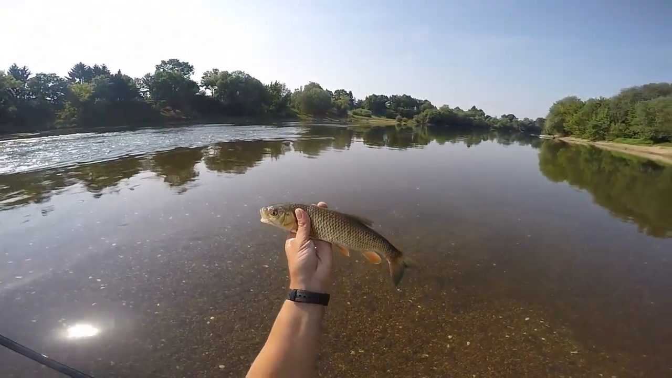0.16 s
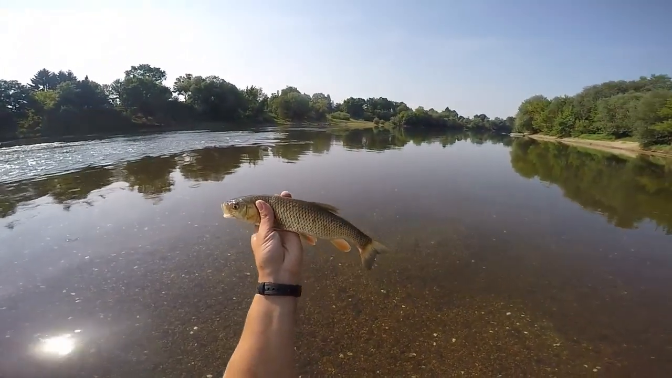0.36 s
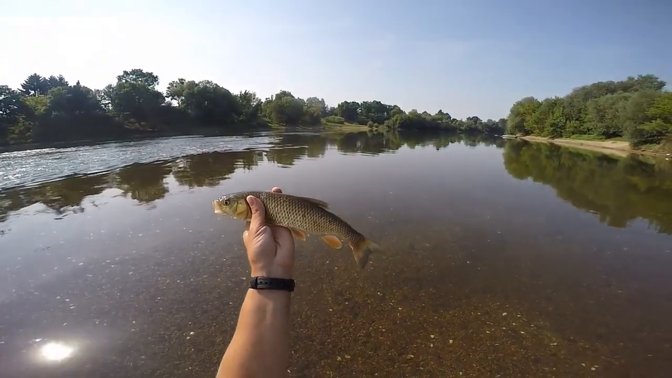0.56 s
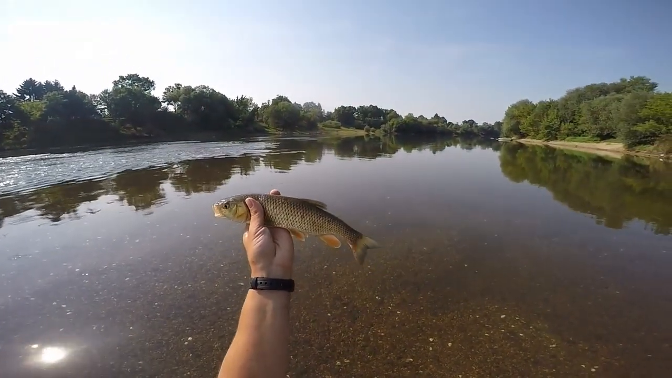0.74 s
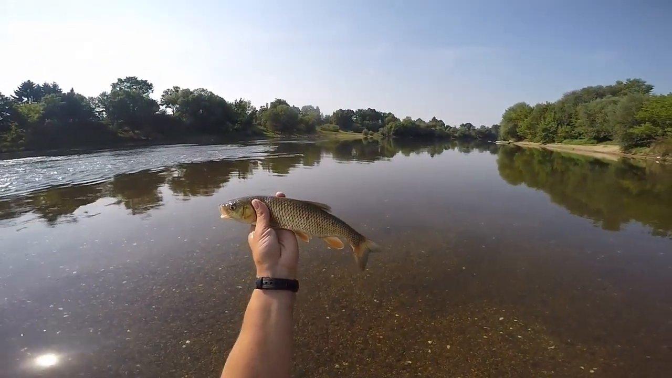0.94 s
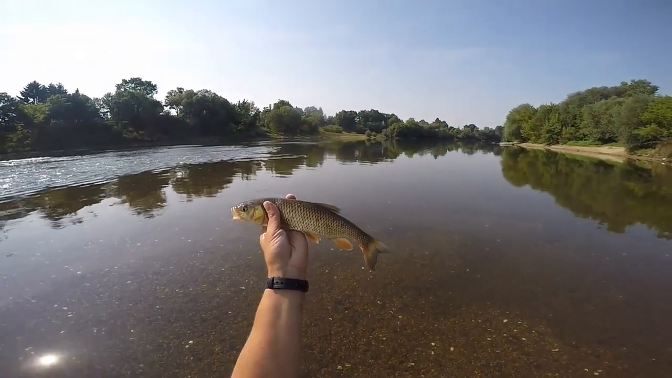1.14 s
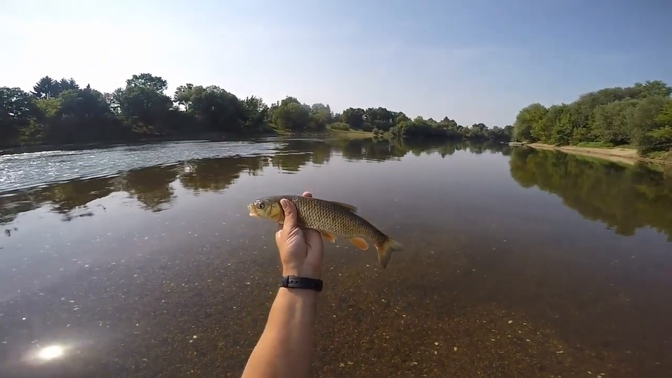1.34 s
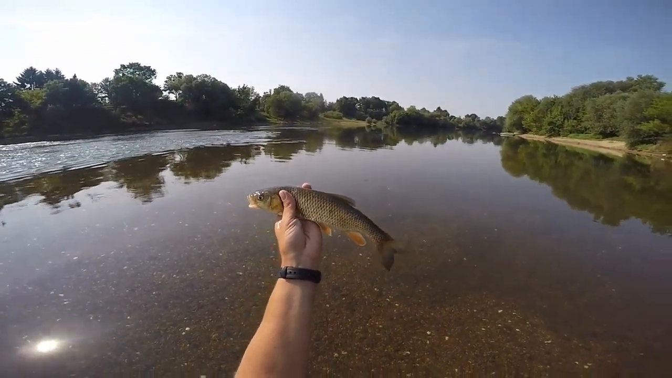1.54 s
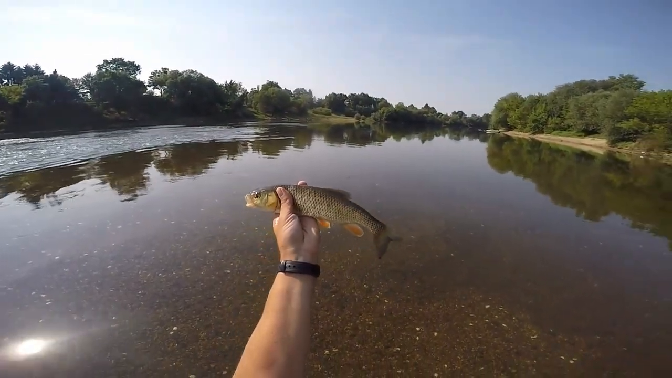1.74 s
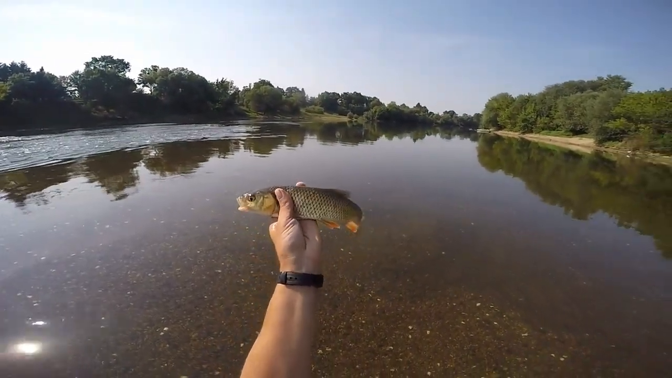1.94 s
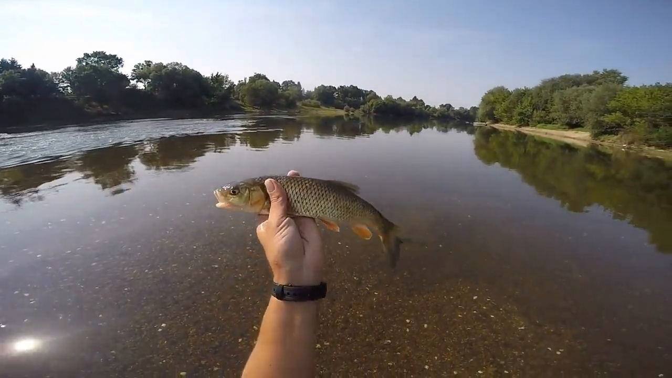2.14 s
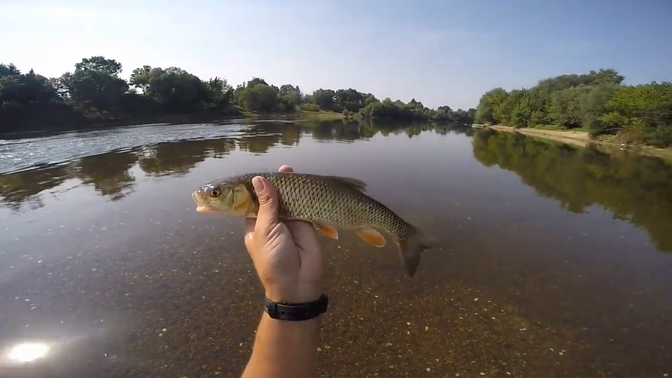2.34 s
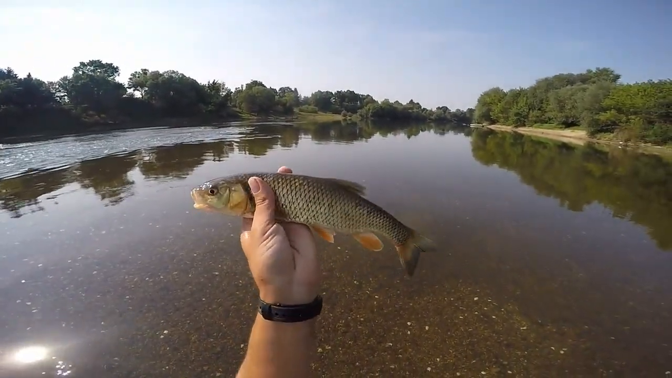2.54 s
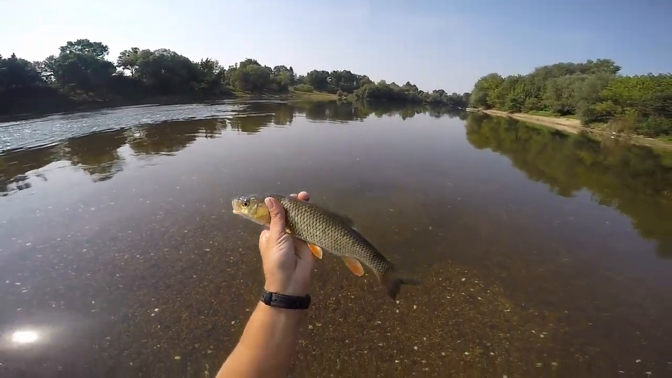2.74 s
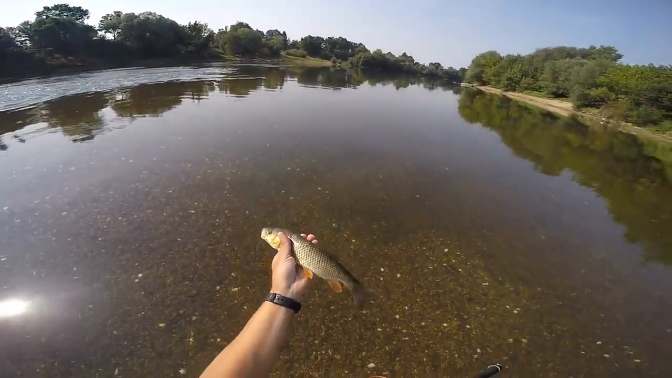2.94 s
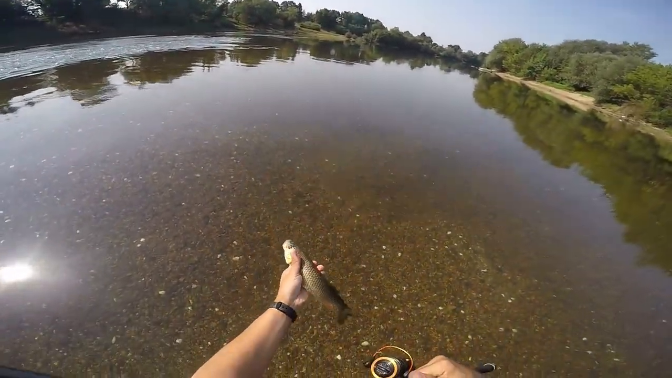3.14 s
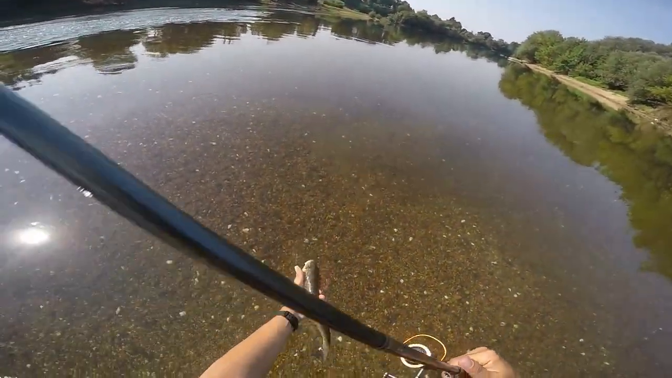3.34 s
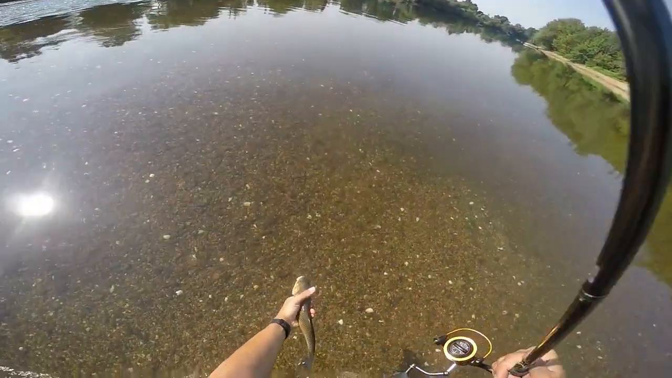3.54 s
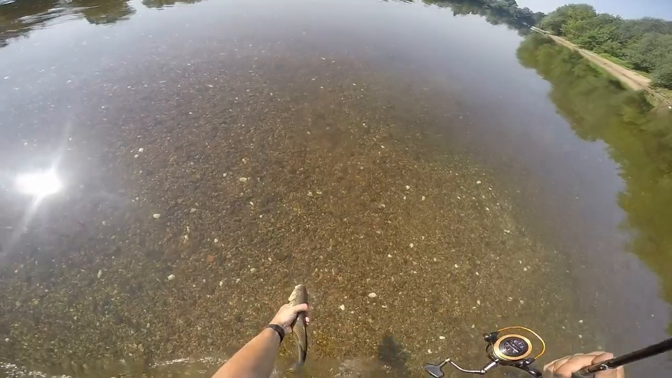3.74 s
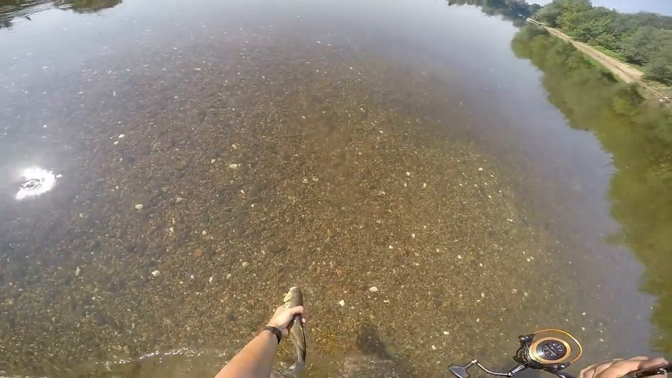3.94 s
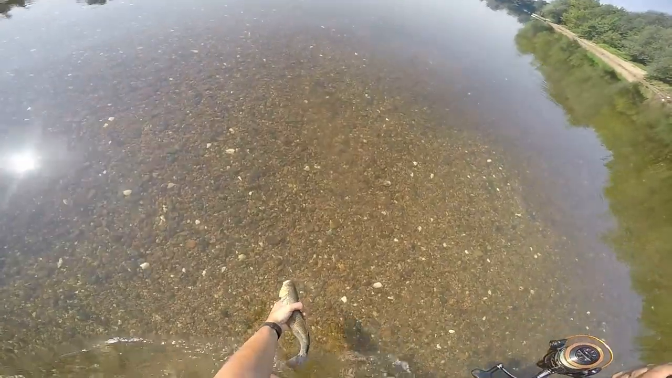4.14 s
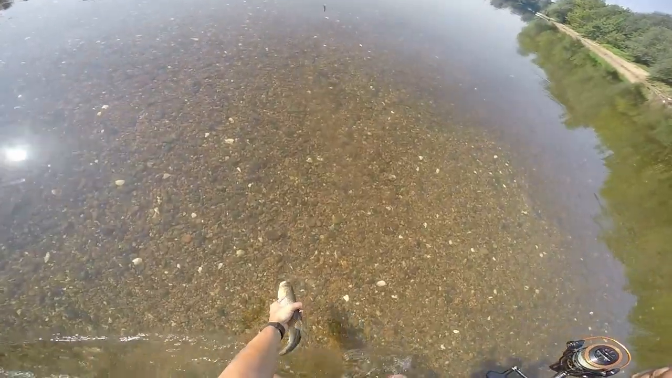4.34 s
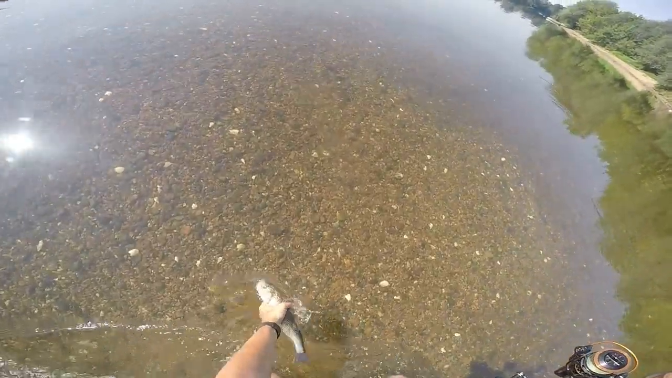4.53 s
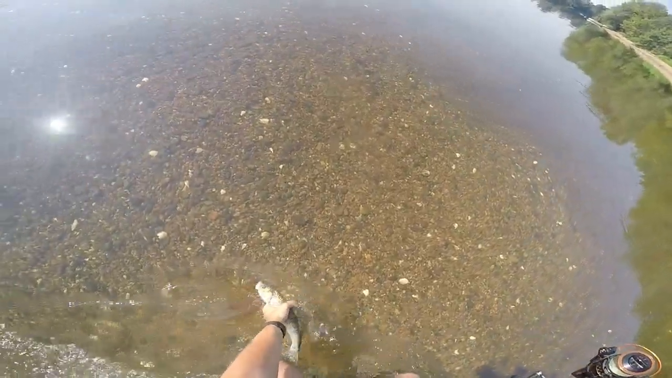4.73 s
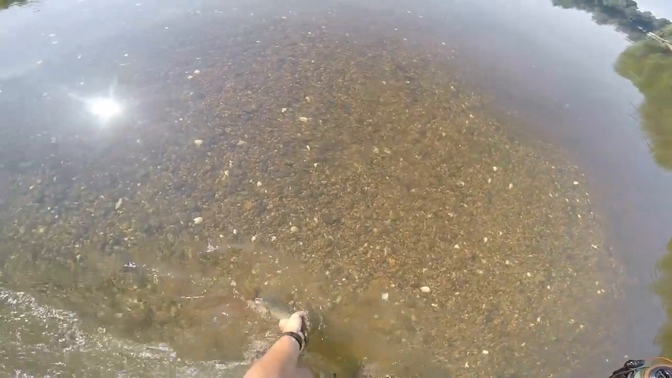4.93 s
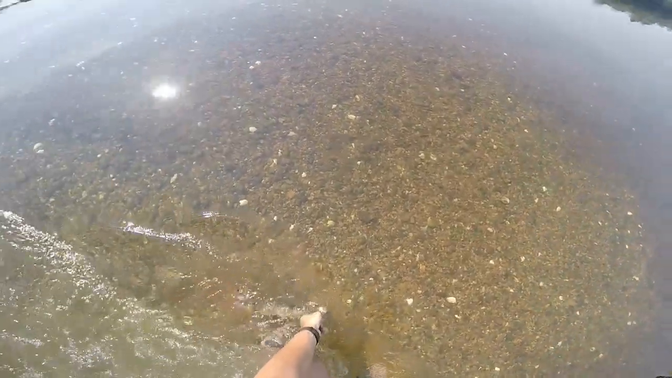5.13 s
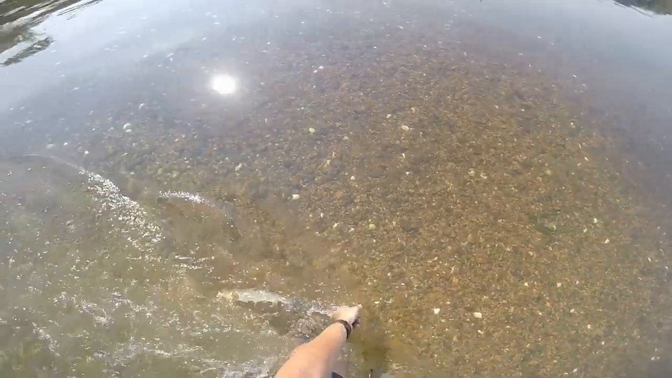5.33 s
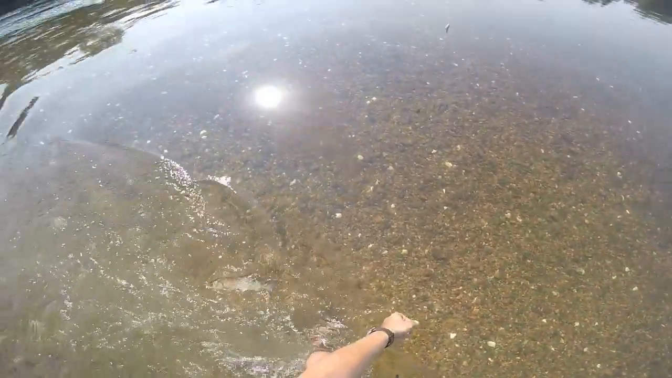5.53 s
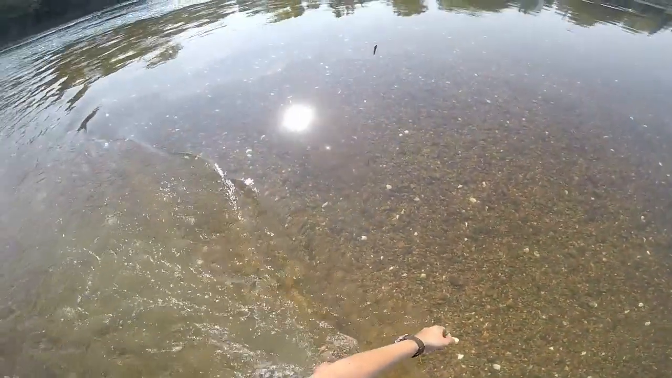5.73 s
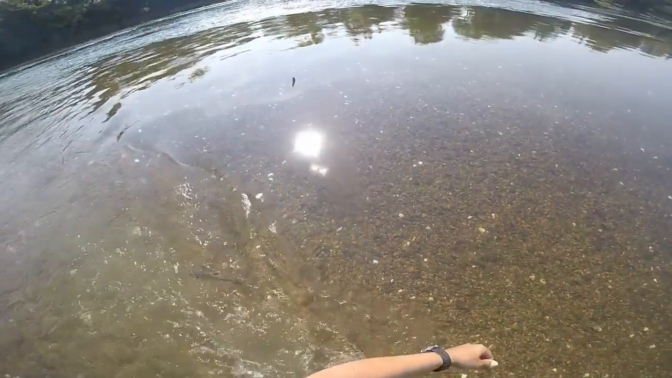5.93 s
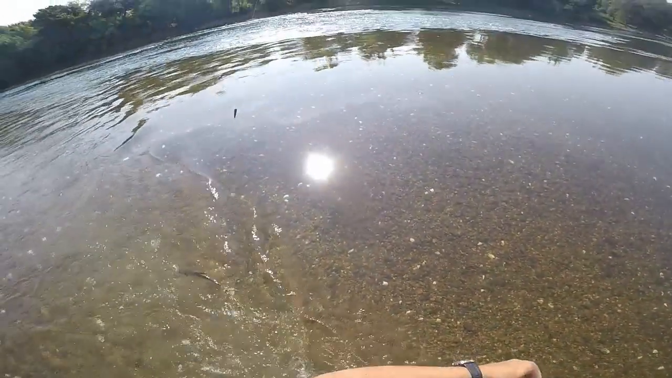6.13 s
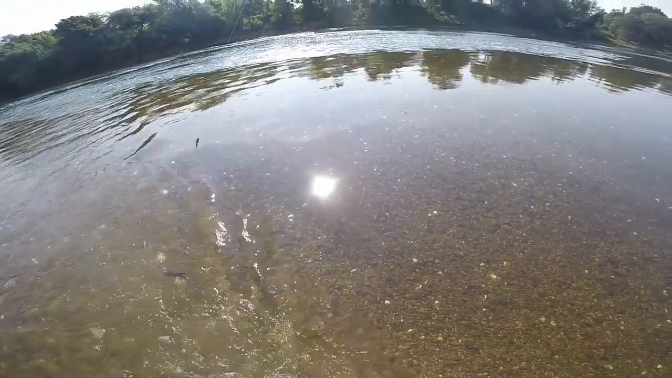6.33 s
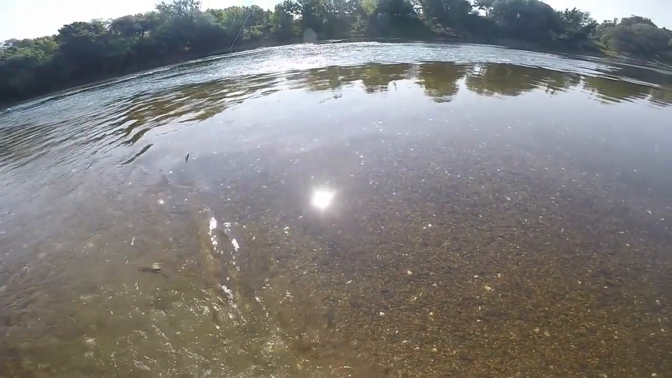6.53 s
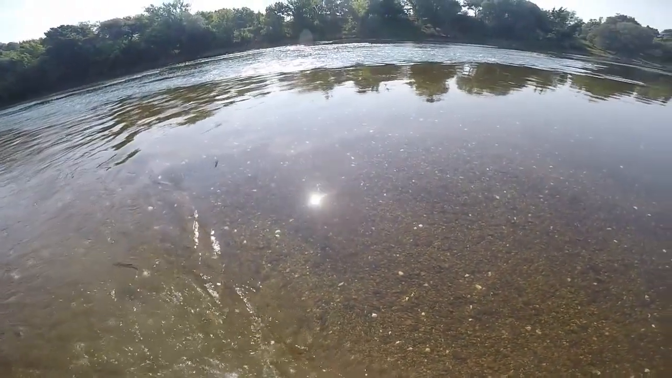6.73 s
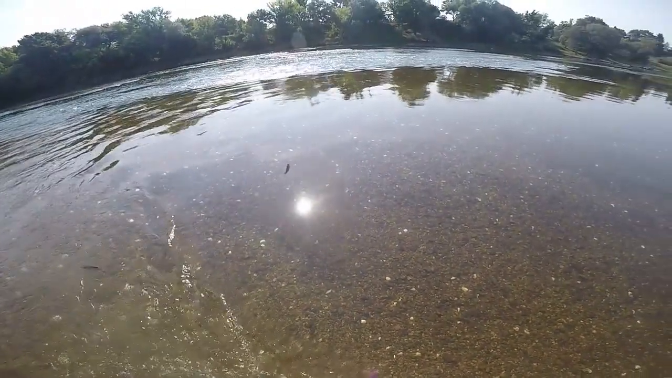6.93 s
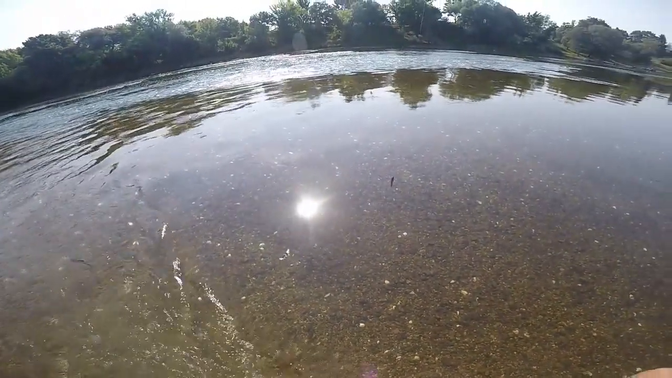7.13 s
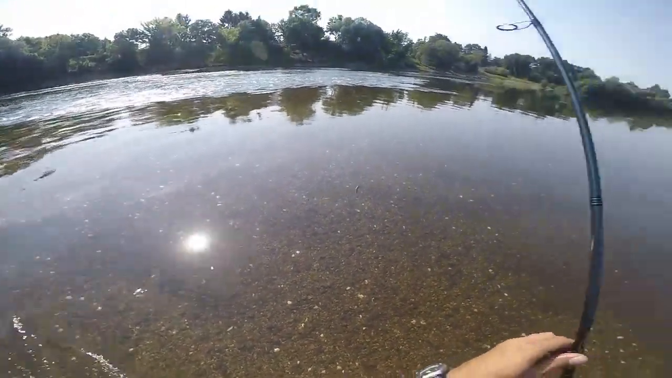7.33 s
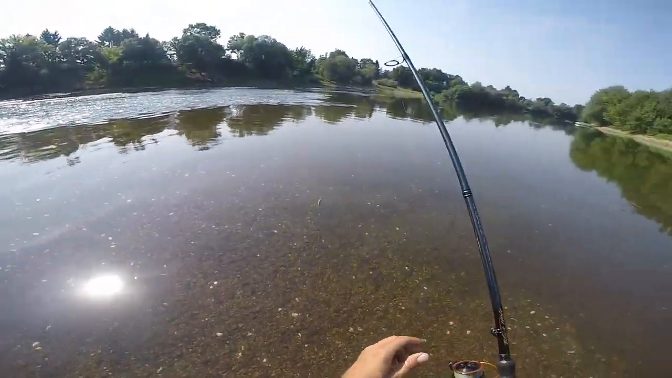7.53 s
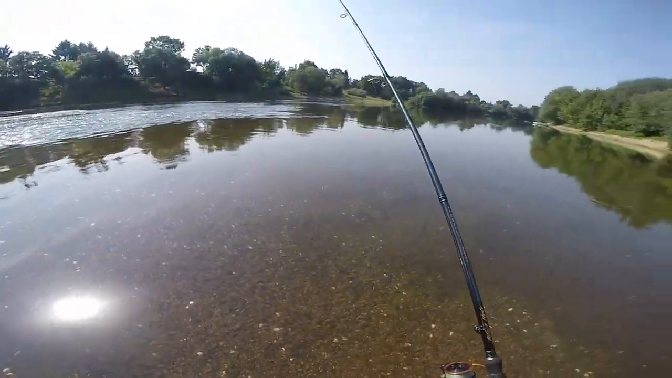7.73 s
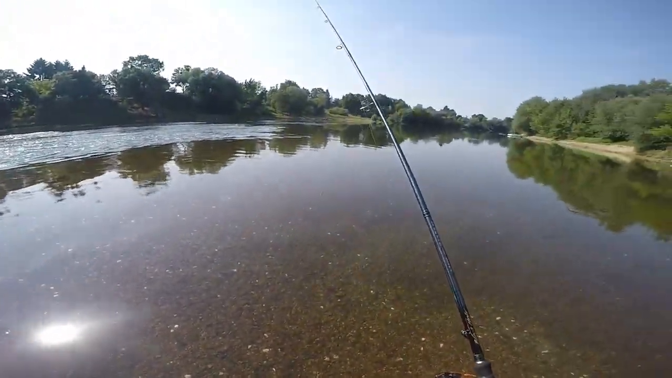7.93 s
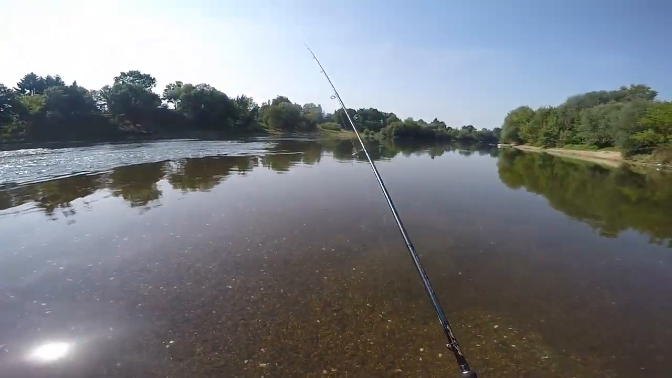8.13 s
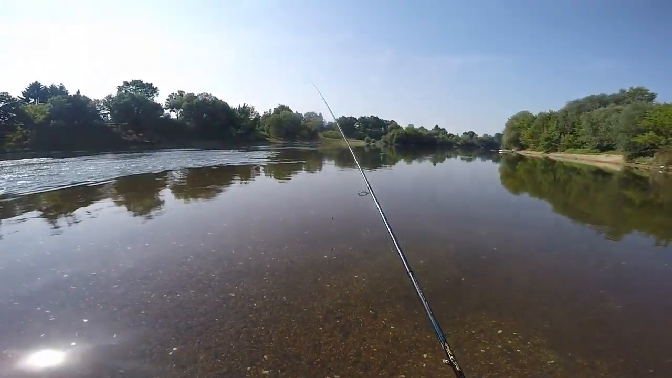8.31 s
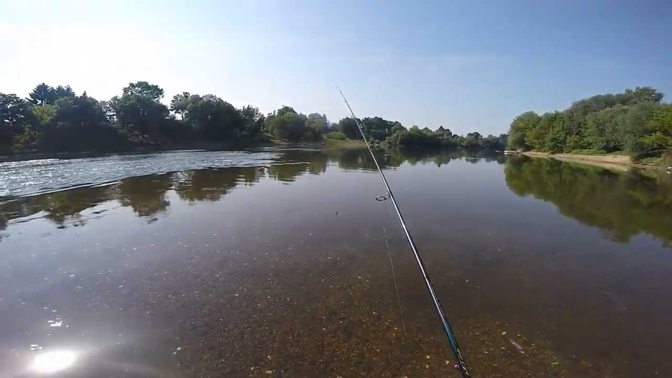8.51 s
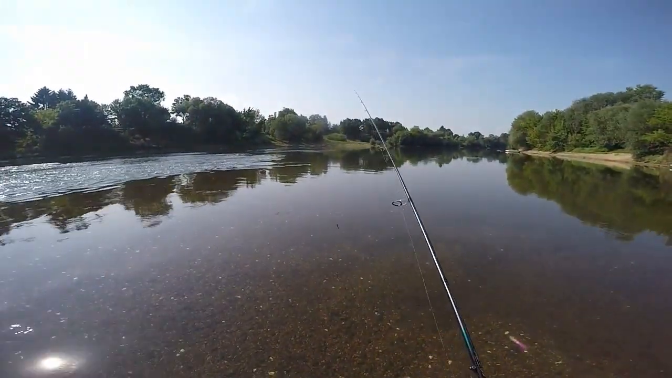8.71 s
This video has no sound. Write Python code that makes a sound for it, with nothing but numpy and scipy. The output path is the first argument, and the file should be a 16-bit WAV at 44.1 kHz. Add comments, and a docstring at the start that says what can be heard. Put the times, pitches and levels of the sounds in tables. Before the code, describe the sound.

Outdoors on a calm shallow river, heard from a body-worn microphone in a closed case. Soft gurgles, drips and an even distant hiss come first, with dull low knocks. Around the middle, water is stirred close by, a fish kicks free with a small bubbly splash and fine droplets, then the wash fades to gentle lapping. A deep uneven rumble of movement runs beneath.

```python
"""A shallow, slow river: an angler wades and lets a fish go, while a riffle hisses far off.
Close by, the bow wave of the steps breaks into filtered bubble grains, plinks and droplet ticks; gliding sines
make the gurgles round the legs, the tail splash and the rings of the drops. Coloured noise makes the riffle.
The microphone is in a body-worn camera in a closed case, whose resonances lift a few bands; it also picks up
a low rumble of movement from shaken noise, knocks on the mount, and a thin electronic whine."""
import sys
import numpy as np
from scipy import signal
from scipy.fft import rfft, irfft
from scipy.io import wavfile
from scipy.ndimage import uniform_filter1d

SR = 44100
rng = np.random.default_rng(int(sys.argv[2]) if len(sys.argv) > 2 else 0)


def generate_wav(signal):
    """Clip the signal to [-1, 1] and save it as 16-bit WAV at the path in sys.argv[1]."""
    frames = np.transpose(np.atleast_2d(signal))
    scaled = np.clip(frames, -1, 1) * 32767
    pcm = np.round(scaled).astype(np.int16)
    wavfile.write(sys.argv[1], SR, pcm)


N = 386754  # length in samples

# Water stirred by legs and hand, most as the fish swims off: (time [s], relative level [dB])
WADING_CURVE = [(0, -70), (1.5, -73), (2.9, -80), (3.4, -73), (3.65, -59.5), (4.2, -56.5), (4.55, -58),
                (4.84, -54.5), (4.97, -58.5), (5.35, -56.5), (5.85, -59), (6.2, -65), (6.75, -63),
                (7.2, -65), (7.5, -70), (8.3, -71), (8.77, -65)]
# The fish kicks free and beats air under: (start [s], length [s], rms level over that length [dB])
TAIL_SPLASH_EVENT = (4.6, .36, -57.5)
# Largest air pockets under wavelets and splashes:
# (time [s], relative level [dB], starting pitch [Hz], share by which the pitch rises, or falls if negative [-])
GURGLE_EVENTS = [(0.365, -45.5, 468, .16), (0.547, -48, 447, 0.5), (0.707, -47, 395, 0.38),
                 (1.105, -46.5, 422, 0.26), (1.145, -46, 530, 0.67), (1.333, -48.5, 336, 0.36),
                 (1.47, -47, 360, .45), (2.365, -49, 468, 0.083), (3.561, -50.5, 300, -.1),
                 (3.608, -45.5, 203, 0.19), (3.625, -39.5, 890, -.1), (3.758, -41, 814, 0.34),
                 (3.823, -41.5, 356.5, 0.15), (4.207, -44.5, 370, 0.37), (4.35, -41, 1013, -0.023),
                 (4.463, -37.5, 297, 0.25), (4.491, -52.5, 491, .4), (4.796, -46, 987, 0.068),
                 (4.817, -40, 2030, .1), (5.406, -48.5, 377, -.06), (5.457, -51, 315, -0.022),
                 (5.681, -46, 523, .2), (6.924, -49, 396, .35), (7.568, -48, 377, -0.16),
                 (7.944, -51, 329, 0.36), (8.503, -47, 370, 0.077), (8.632, -44.5, 626, 0.18)]
# Nearest drops: (time [s], relative level [dB], pitch of the ring [Hz])
DRIP_EVENTS = [(0.1, -46.5, 3500), (0.328, -50, 3530), (0.436, -52.5, 2400), (0.956, -45, 1010),
               (1.892, -45, 1000), (2.246, -47.5, 930), (3.39, -47.5, 1130), (3.439, -41.5, 930),
               (3.621, -50.5, 7740), (3.967, -43, 3600), (4.181, -52, 7940), (4.475, -39.5, 987),
               (4.707, -40, 4220), (4.994, -42.5, 3600), (5.359, -44, 3700), (5.616, -42.5, 2520),
               (5.626, -39.5, 3450), (5.678, -42.5, 3510), (6.708, -45, 3700), (6.751, -47, 4300),
               (6.76, -51, 7260), (6.793, -42.5, 1010), (6.882, -42, 3600), (7.175, -43, 980),
               (7.264, -47.5, 4040), (7.448, -41, 1020)]
# Sharp little clicks: (time [s], peak level [dB], centre frequency [Hz])
CLICK_EVENTS = [(4.471, -42.5, 8600), (4.645, -42.5, 9200), (4.745, -43, 9600), (5.207, -45, 9200),
                (7.012, -44.5, 10300), (8.673, -41, 3740)]
# Spectrum of the stirred water and the trickle: (frequency [Hz], relative level [dB])
WASH_SPECTRUM = [(200, -3), (330, -6), (550, -1), (900, 3), (1250, -2.5), (1700, 1.5), (2200, -4),
                 (3000, -6.5), (4400, -5), (5500, -16), (8000, -13)]
# Spectrum of the falling droplets: (frequency [Hz], relative level [dB])
SPRAY_SPECTRUM = [(3000, -8), (4400, -1), (5500, -7), (7200, -2.5), (8000, -3.5), (9100, 0.5),
                  (10200, -7.5), (15000, -7)]
# Colour of the wavelets' gulps: (frequency [Hz], relative level [dB])
GULP_COLOUR = [(280, -7), (450, 1), (700, -2)]
# Spectrum of the far broken water: (frequency [Hz], relative level [dB])
RIFFLE_SPECTRUM = [(60, 12.5), (120, 4), (250, -2), (420, -3), (700, -5.5), (1000, -8), (1400, -9),
                   (2400, -13), (3000, -14), (4500, -16), (7000, -19), (10000, -22.5), (15000, -24.5)]
# How strongly the wearer moves (holds still, bends down, stands up): (time [s], relative level [dB])
MOTION_CURVE = [(0, -40), (1.3, -46), (1.62, -39.5), (2.4, -49), (3.1, -41), (3.32, -33.5), (3.6, -35.5),
                (4.03, -27.5), (4.2, -36), (4.44, -30.5), (4.62, -40.5), (5.0, -41), (5.62, -31),
                (5.9, -37.5), (6.9, -39.5), (7.58, -37), (8.2, -42.5), (8.77, -46.5)]
# Spectrum of the mount's boom: (frequency [Hz], relative level [dB])
BOOM_SPECTRUM = [(28, -9), (37, 1), (45, 2), (54, -5), (66, -17.5), (85, -35), (125, -59), (250, -60)]
# Spectrum of the deep sway: (frequency [Hz], relative level [dB])
SWAY_SPECTRUM = [(14, 0.5), (22, -8.5), (31, 5), (38, -18.5), (50, -23)]
# Knocks on the camera mount: (time [s], relative level [dB])
BUMP_EVENTS = [(0.5634, -30), (0.865, -30.5), (1.589, -36.5), (8.179, -37)]
# Air resonances of the camera case: (frequency [Hz], width [Hz], lift before the power is restored [dB])
CASE_RESONANCES = [(980, 205, 8.5), (2377, 310, 5), (3483, 370, 7.5), (4300, 140, -0.5)]

SPRAY_BELOW_WASH_DB, SPRAY_FOLLOWS = 12.5, 1  # at the height of the splash; dB of spray per dB of wash
GURGLE_CYCLES = 16.7    # ring length in cycles of the starting pitch, so low pockets last longest
DRIP_RING_S = 0.0085    # ring length of the case at 1 kHz; higher pitches ring shorter
RIFFLE_DB, WHINE_DB = -58, -78.5  # rms levels before their flutter
CUTOFF_HZ = 15350


def from_db(db):
    """Decibels to gain."""
    return 10 ** (np.asarray(db) / 20)


def rms_one(x):
    """Scale to unit power."""
    return x / np.sqrt(np.mean(x ** 2) + 1e-20)


def in_time(rows):
    """Each column of a curve, at every sample."""
    s, *columns = np.transpose(rows)
    return [np.interp(np.arange(N) / SR, s, c) for c in columns]


def add(out, s, sound):
    """Mix a short sound in at time s."""
    i = int(np.clip(round(s * SR), 0, N))
    out[i:i + len(sound)] += sound[:N - i]


def coloured(x, spectrum):
    """Filter a sound by a spectrum that falls away outside its end points; rms 1."""
    hz, db = np.transpose(spectrum)
    f = np.maximum(np.arange(N // 2 + 1) * SR / N, 1)
    skirts = np.minimum(f / hz[0], 1) ** 2 * np.minimum(hz[-1] / f, 1) ** 2
    gain = from_db(np.interp(np.log(f), np.log(hz), db))
    return rms_one(irfft(rfft(x) * skirts * gain, N))


def drift(rate):
    """Slow random wander of unit rms: noise through two equal poles at rate Hz."""
    # computed at every 40th sample; the first 2000 values let the filter settle
    r = np.exp(-80 * np.pi * rate / SR)
    noise = rng.standard_normal(N // 40 + 2002)
    slow = signal.lfilter([1], [1, -2 * r, r * r], noise)[2000:]
    return np.interp(np.arange(N) / 40, np.arange(len(slow)), rms_one(slow))


def resonance(x, hz, width_hz):
    """Two-pole band-pass with gain near 1 on top."""
    r = np.exp(-np.pi * width_hz / SR)
    zeros = np.array([1, 0, -1]) * (1 - r * r) / 2
    poles = [1, -2 * r * np.cos(2 * np.pi * hz / SR), r * r]
    return signal.lfilter(zeros, poles, x + 1e-18)


def burst(t, decay_s, hz, width_hz):
    """A dying puff of noise through two equal resonances; peak 1."""
    noise = rng.standard_normal(len(t)) * np.exp(-t / decay_s)
    band = resonance(resonance(noise, hz, width_hz), hz, width_hz)
    return band / np.abs(band).max()


def in_case(x):
    """The air in the camera case lifts a few narrow bands; the power stays the same."""
    lifted = x.copy()
    for hz, width_hz, db in CASE_RESONANCES:
        lifted = lifted + (from_db(db) - 1) * resonance(x, hz, width_hz)
    return lifted * np.std(x) / np.std(lifted)


def grains(per_s, low_hz, high_hz, cycles, spread_db, count=28):
    """Tiny grains of uneven size, born at random, ring at one of count pitches for some cycles; rms 1."""
    sizes = from_db(spread_db * np.minimum(rng.exponential(1, N), 4)) * rng.choice([-1, 1], N)
    births = sizes * (rng.random(N) < per_s / SR)
    dealt = rng.integers(0, count, N)
    pitches = np.geomspace(low_hz, min(high_hz, .45 * SR), count)
    return rms_one(sum(resonance(births * (dealt == k), hz, 2 * hz / cycles) for k, hz in enumerate(pitches)))


def gliding_ring(first_hz, last_hz, length, swell):
    """A sine swells and dies while its pitch glides, as of an air pocket nearing the surface; peak near 1."""
    age = np.arange(int(2 * length * SR) + 2) / (length * SR)  # in ring lengths
    hz = first_hz * (last_hz / first_hz) ** np.minimum(age, 1.3)
    shape = (1 - np.exp(-(age / swell) ** 2)) * np.exp(-1.8 * age ** 2)
    return shape / shape.max() * np.sin(2 * np.pi * np.cumsum(hz) / SR)


def bubble_cloud(times, low_hz, high_hz, rise, cycles, spread_db):
    """One rising bubble at each time, of random size and strength; the small ones are fainter."""
    out = np.zeros(N)
    for s, (size, glide, strength) in zip(times, rng.random((len(times), 3))):
        hz = low_hz * (high_hz / low_hz) ** size
        gain = from_db(spread_db * (strength - 1)) * (low_hz / hz) ** (1 / 3)
        add(out, s, gain * gliding_ring(hz, hz * (1 + rise * glide), cycles / hz, swell=0.22))
    return out


def stirred_bubbles(level_db, low_hz, high_hz, rise, cycles, spread_db, count):
    """More stirring makes both more and stronger bubbles; they follow the given level."""
    stir = from_db(level_db)
    shares = (np.arange(count) + rng.random(count)) / count
    times = np.interp(shares, np.cumsum(stir) / stir.sum(), np.arange(N) / SR)
    cloud = bubble_cloud(times, low_hz, high_hz, rise, cycles, spread_db)
    return rms_one(cloud * np.sqrt(stir)) * np.sqrt(np.mean(stir ** 2))


def trembling(x, depth, rate):
    """The rings are never quite even: their strength and phase wobble at random."""
    wobble = 1 + depth * (drift(rate) + 1j * drift(rate))
    return (signal.hilbert(x) * wobble).real / np.hypot(1, depth)


def case_ring(hz, rise=1.016):
    """A drop's tick makes the camera case ring for a few milliseconds, longest at low pitch."""
    return gliding_ring(hz, hz * rise, DRIP_RING_S * np.sqrt(1000 / hz), swell=.25)


def fizz(wash_db, level_db=-1.5, clump_db=2.5):
    """The breaking wave froths with tiny bubbles that burst in clumps."""
    stir = from_db(wash_db - wash_db.max())
    # stirring sets how dense the grains are; the division evens out their power
    froth = grains(4200 * stir, 256.5, 6430, cycles=16.4, spread_db=3.0) / np.sqrt(stir)
    clumps_db = clump_db * drift(17.3)
    return in_case(coloured(froth, WASH_SPECTRUM)) * from_db(level_db + wash_db + clumps_db)


def churn(wash_db, level_db=-6.5):
    """Air dragged under by the bow wave rings out as clear little plinks."""
    plinks = stirred_bubbles(wash_db, low_hz=850, high_hz=4700, rise=.16, cycles=18, spread_db=22, count=760)
    return from_db(level_db) * in_case(plinks)


def spray(spray_db, level_db=0.0, spatter_db=3.0, tick_db=0.0):
    """Fine droplets fall back: ticks on the surface mix with short high pings."""
    pings = stirred_bubbles(spray_db, low_hz=3900, high_hz=11500, rise=.06, cycles=14, spread_db=20, count=1500)
    stir = from_db(spray_db - spray_db.max())
    ticks = grains(1500 * stir, 4700, 14000, cycles=11.0, spread_db=1.0, count=14) / np.sqrt(stir)
    ticks = from_db(spray_db + tick_db) * coloured(ticks, SPRAY_SPECTRUM)
    patter = np.std(pings) * coloured(pings, SPRAY_SPECTRUM) + ticks
    return patter * from_db(level_db + spatter_db * drift(30)) / np.hypot(1, from_db(tick_db))


def tail_splash(count=52):
    """The tail leaves a dense cluster of short rising plops, thickest as the wave folds over."""
    start, length, db = TAIL_SPLASH_EVENT
    times = start + length * rng.beta(2.4, 1.7, count)
    plops = bubble_cloud(times, low_hz=844, high_hz=3600, rise=0.19, cycles=18, spread_db=14)
    return from_db(db) * rms_one(plops) * np.sqrt(length * SR / N)


def gurgles(level_db=-4.5):
    """Large air pockets ring under folding wavelets, most gliding up in pitch."""
    out = np.zeros(N)
    for s, db, hz, rise in GURGLE_EVENTS:
        add(out, s, from_db(db) * gliding_ring(hz, hz * (1 + rise), GURGLE_CYCLES / hz, swell=0.18))
    return from_db(level_db) * trembling(out, depth=.45, rate=80)


def drips(level_db=-2.0, tick_db=-5.5, tick_decay_s=0.0022, tick_breadth=0.69):
    """Near drops fall from hand, fish and rod: each ticks and makes the case ring unevenly."""
    out, t = np.zeros(N), np.arange(SR // 50) / SR
    for s, db, hz in DRIP_EVENTS:
        add(out, s, from_db(db + tick_db) * burst(t, tick_decay_s, hz, tick_breadth * hz))
        add(out, s - DRIP_RING_S / 8, from_db(db) * case_ring(hz))  # early, to leave time for its swell
    return from_db(level_db) * trembling(out, depth=.25, rate=300)


def clicks(decay_s=0.0012, breadth=0.61):
    """Hard little contacts, each a brief bright burst."""
    out, t = np.zeros(N), np.arange(SR // 50) / SR
    for s, db, hz in CLICK_EVENTS:
        add(out, s, from_db(db) * burst(t, decay_s, hz, breadth * hz))
    return out


def wavelets(wash_db, level_db=-69.0, follows=0.16, surge_db=2.5, count=170):
    """The current folds round the legs in soft rising gulps that overlap, surge, and sink a little in calm water."""
    times = (np.arange(count) + rng.uniform(-1, 2, count)) / count * N / SR
    gulps = bubble_cloud(times, low_hz=259, high_hz=681.4, rise=.35, cycles=15.9, spread_db=8.5)
    gulps = coloured(trembling(gulps, depth=0.54, rate=90), GULP_COLOUR)
    surges = from_db(follows * wash_db + surge_db * drift(6.1))
    return from_db(level_db) * rms_one(gulps * surges)


def far_drips(wash_db, peak_db=-52.0, follows=.25, detune=0.074, count=60):
    """Fainter drops fall at random and ring the case near its resonances; stirring makes them stronger."""
    out = np.zeros(N)
    for k, (when, strength, pitch) in enumerate(rng.random((count, 3))):
        i = int((k + when) / count * (N - 1))
        hz = CASE_RESONANCES[int(pitch * 3)][0] * (1 + detune * rng.uniform(-1, 1))  # one of the first three
        db = peak_db + follows * (wash_db[i] - wash_db.mean()) - 10 * strength
        add(out, i / SR, from_db(db) * case_ring(hz))
    return trembling(out, depth=.25, rate=300)


def lapping(level_db=-66.0, count=1100):
    """Countless faint wavelets babble all around."""
    times = (np.arange(count) + rng.random(count)) / count * N / SR
    babble = bubble_cloud(times, low_hz=328.3, high_hz=2600, rise=0.345, cycles=16.25, spread_db=18.5)
    return from_db(level_db) * in_case(rms_one(babble))


def trickle(level_db=-71):
    """Small bubbles burst softly on the open river."""
    bursts = grains(260, 830, 5100, cycles=20, spread_db=3.0)
    return from_db(level_db) * in_case(coloured(bursts, WASH_SPECTRUM))


def riffle(flutter_db=0.51):
    """Far broken water merges into an even hiss."""
    hiss = in_case(coloured(rng.standard_normal(N), RIFFLE_SPECTRUM))
    return hiss * from_db(RIFFLE_DB + flutter_db * drift(8.7))


def rumble(motion_db, evenness=0.85, sway_db=-43.0, sway_follow=0.58, boom_db=-2.0):
    """Movement shakes the camera mount: a deep sway always, a resonant boom when the moves are strong."""
    def shake(spectrum):
        """Low noise with its swells partly evened out; rms 1."""
        noise = coloured(rng.standard_normal(N), spectrum)
        power = uniform_filter1d(np.abs(signal.hilbert(noise)) ** 2, SR // 10)
        return rms_one(noise / power ** (min(evenness, 1) / 2))
    sway = from_db(sway_db + sway_follow * (motion_db - motion_db.mean()))
    boom = from_db(motion_db + boom_db)
    return sway * shake(SWAY_SPECTRUM) + boom * shake(BOOM_SPECTRUM)


def bumps(mount_hz=43, contact_s=0.0017, knock_db=-15.0, knock_hz=420, knock_width_hz=900, knock_decay_s=0.0027):
    """A knock rattles the case briefly and jolts the mount, which swings a couple of times."""
    out, t = np.zeros(N), np.arange(SR // 5) / SR
    swing = np.exp(-t / .03) * np.cos(2 * np.pi * mount_hz * t)
    jolt = (1 - np.exp(-t / contact_s)) * swing
    for s, db in BUMP_EVENTS:
        rattle = from_db(knock_db) * burst(t, knock_decay_s, knock_hz, knock_width_hz)
        add(out, s, from_db(db) * (jolt + rattle))
    return out


def whine(hz=11928):
    """The camera's electronics sing faintly on one high, slightly unsteady note."""
    tone = np.sqrt(2) * np.sin(2 * np.pi * np.cumsum(hz + 3.6 * drift(4.8)) / SR)
    return from_db(WHINE_DB) * tone * (1 + 0.2 * drift(90))


def scene():
    """Wader close by, river around and camera at the microphone, in one channel."""
    wash_db, = in_time(WADING_CURVE)
    motion_db, = in_time(MOTION_CURVE)
    spray_db = wash_db.max() - SPRAY_BELOW_WASH_DB + SPRAY_FOLLOWS * (wash_db - wash_db.max())
    wader = fizz(wash_db) + churn(wash_db) + spray(spray_db) + tail_splash()
    wader = wader + gurgles() + drips() + clicks() + far_drips(wash_db)
    river = wavelets(wash_db) + lapping() + trickle() + riffle()
    camera = rumble(motion_db) + bumps() + whine()
    return (wader + river + camera)[None]


def record(dry):
    """A steep elliptic low-pass cuts the top."""
    return signal.sosfilt(signal.ellip(12, .1, 80, CUTOFF_HZ, fs=SR, output="sos"), dry)


dry = scene()
out = record(dry)
generate_wav(out)
```